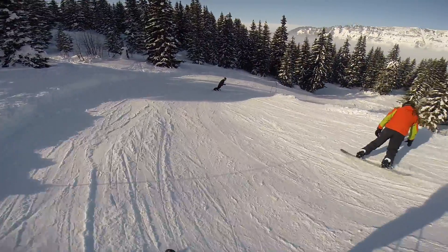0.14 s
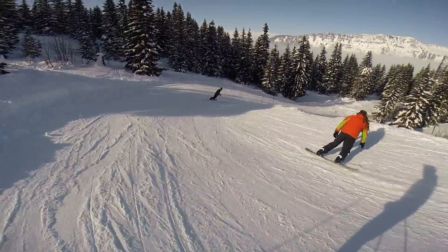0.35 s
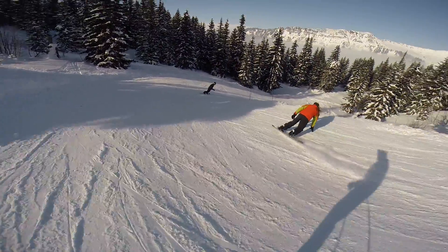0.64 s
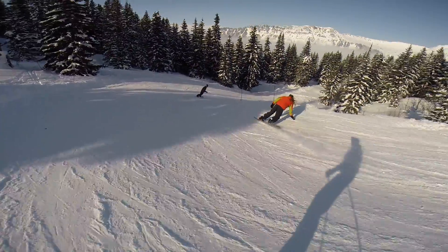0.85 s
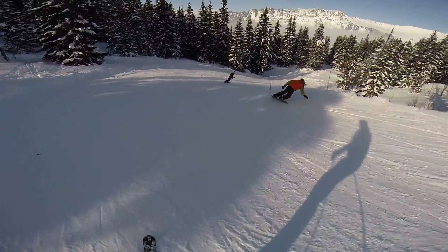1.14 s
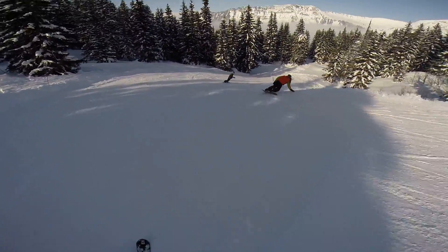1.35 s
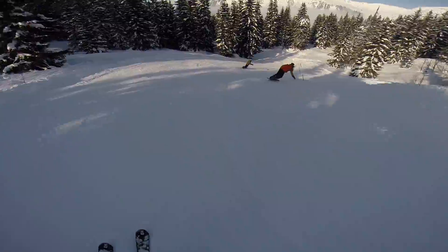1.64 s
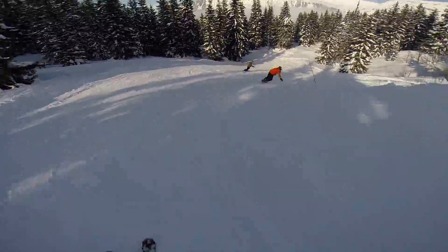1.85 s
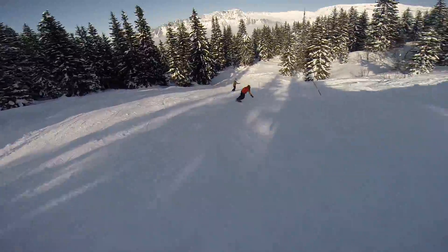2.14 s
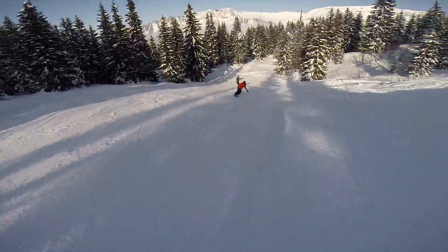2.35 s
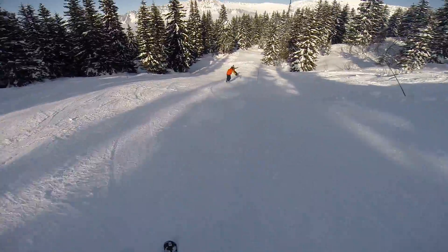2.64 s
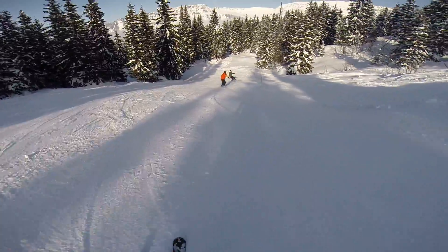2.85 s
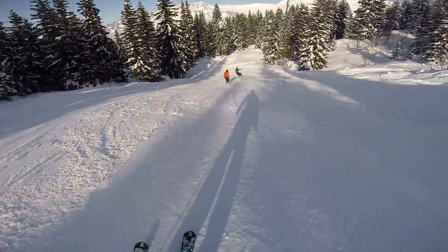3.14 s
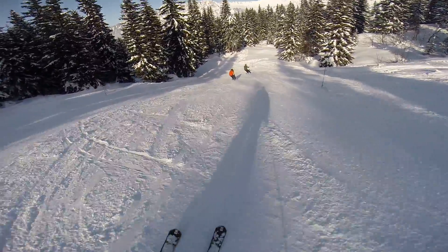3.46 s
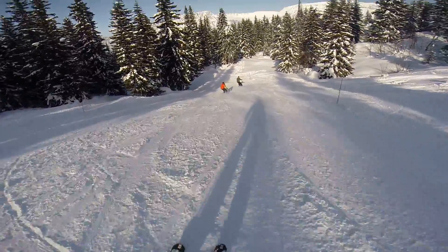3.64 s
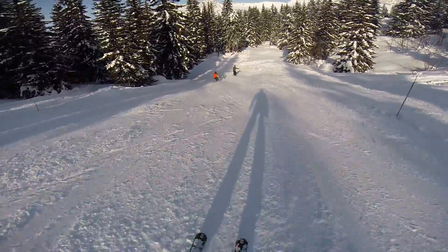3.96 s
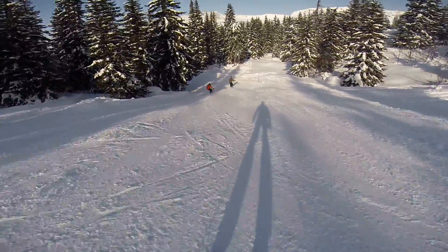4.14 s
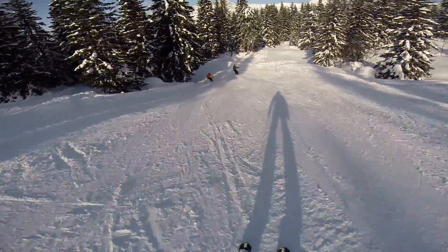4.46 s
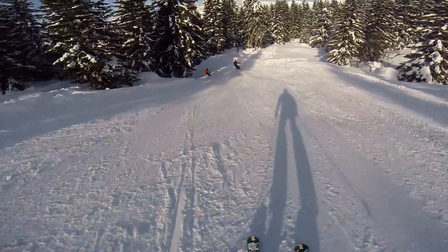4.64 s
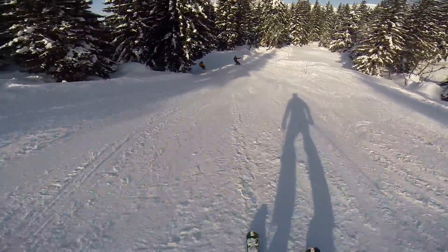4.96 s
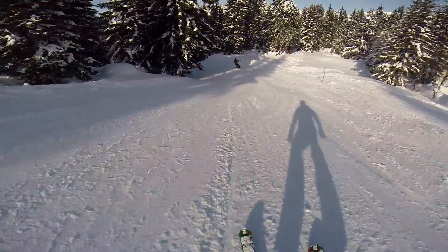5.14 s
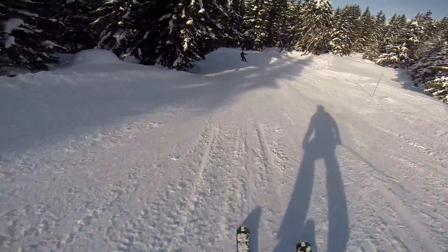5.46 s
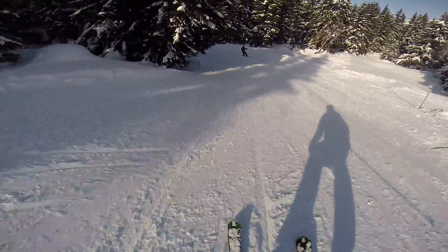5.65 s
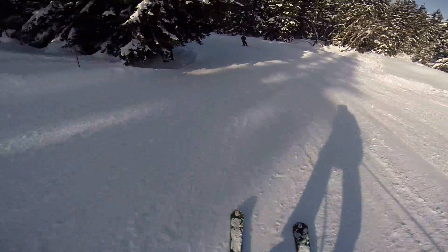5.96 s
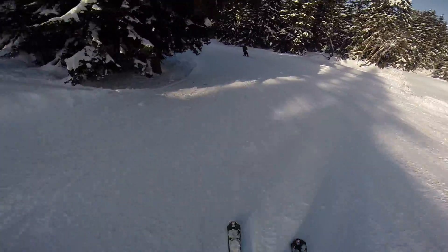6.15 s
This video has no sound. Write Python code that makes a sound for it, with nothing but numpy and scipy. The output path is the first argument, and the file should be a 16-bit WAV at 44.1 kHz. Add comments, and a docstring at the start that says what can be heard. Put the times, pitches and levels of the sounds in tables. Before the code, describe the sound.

First-person ski run: steady grainy snow hiss, low bumps and buffeting, small ticks and icy crackles, headwind growing stronger toward the end.

```python
"""Skis glide down a groomed slope, heard by a camera in a closed case on the skier's helmet.
From the start filtered noise and random grains hiss and spray off the edges, turbulence noise rumbles
on the case, bumps shake its mount, and low buffeting noise swells and sinks. Damped gear ticks join
after a second, snow spurts and ice grains crackle here and there. From 3.6 s an unsteady sine whistles
over the case's port, the headwind and hiss grow strong, and grains crack thickest near the end, at 6.3 s."""
import sys
import numpy as np
from scipy import signal
from scipy.fft import rfft, irfft, next_fast_len
from scipy.io import wavfile
from scipy.ndimage import uniform_filter1d, map_coordinates

SR = 44100
rng = np.random.default_rng(int(sys.argv[2]) if len(sys.argv) > 2 else 0)


def master_out(mix):
    """Clip the mix to full scale and print it as 16-bit PCM to the path in sys.argv[1]."""
    frames = np.transpose(np.atleast_2d(mix))
    ceiling = np.clip(frames, -1, 1)
    pcm = np.round(ceiling * 32767).astype(np.int16)
    wavfile.write(sys.argv[1], SR, pcm)


N = 277830  # samples, 6.3 s


def amp(db):
    """Gain of a level in dB."""
    return 10 ** (np.asarray(db) / 20)


def unit(x):
    """x at rms 1."""
    return x / np.sqrt(np.mean(x ** 2) + 1e-20)


def noise():
    """White noise for the whole scene."""
    return rng.standard_normal(N)


def curves(rows):
    """One value per sample for each column after the time, joined by straight lines."""
    s, *columns = np.transpose(rows)
    return [np.interp(np.arange(N) / SR, s, column) for column in columns]


def wobble(rate):
    """A smooth random curve, rate knots a second."""
    knots = rng.standard_normal(int(N * rate / SR) + 4)
    return map_coordinates(knots, [np.arange(N) * rate / SR])


def swells(times, sizes, rise_s, tail):
    """Sum of swells: a bell-shaped rise to each peak, then a tail given as a function of the time since."""
    since = np.arange(N) / SR - np.array(times)[:, None]
    shapes = np.where(since < 0, np.exp(-(since / rise_s) ** 2), tail(np.abs(since)))
    return np.array(sizes) @ shapes


def filtered(x, response):
    """x times a response of frequency."""
    m = next_fast_len(N + SR // 2)  # padded, so that the end does not wrap onto the start
    return irfft(rfft(x, m) * response(np.fft.rfftfreq(m, 1 / SR)), m)[..., :N]


def coloured(x, points):
    """x through a (Hz, dB) spectrum, at rms 1."""
    f, db = np.transpose(points)
    return unit(filtered(x, lambda hz: amp(np.interp(np.log(hz + 1), np.log(f), db, -120, -120))))


def patchy(patchy_db):
    """White noise with patches of random gain in time and frequency."""
    spectrum = signal.stft(noise(), nperseg=512)[2]
    field = uniform_filter1d(rng.standard_normal(spectrum.shape), 6, 0)  # smooth over frequency
    field = uniform_filter1d(field, 10, 1)  # and over time
    return signal.istft(spectrum * amp(patchy_db * unit(field)), nperseg=512)[1][:N]


# Headwind. Each row: time in seconds, strength in dB, low rumble in dB; both waver around these.
HEADWIND = [(0, -52.5, -48), (.2, -53, -51.5), (.45, -51, -51.5), (.9, -49, -55.5), (1.15, -50, -48),
            (1.6, -48.5, -47.5), (1.9, -49.5, -52.5), (2.35, -46.5, -46.5), (2.7, -46, -49),
            (3.25, -48, -50.5), (3.8, -49.5, -53.5), (4.3, -45.5, -51), (4.5, -46.5, -46),
            (4.75, -44, -45.5), (5.3, -42.5, -42.5), (5.55, -42.5, -43.5), (5.93, -43.5, -43.5),
            (6.18, -42.5, -39), (6.3, -42, -42)]
# Spectra of the low rumble, the roar and the breath in the port.
# Each row: frequency in Hz, relative level in dB per Hz.
RUMBLE_SPECTRUM = [(45, -33), (72, -3), (130, -5), (160, -10.5), (200, -27)]
ROAR_SPECTRUM = [(110, -35), (145, -2), (175, -2.5), (300, -8), (420, -16), (600, -66)]
PORT_SPECTRUM = [(330, -69), (450, -1), (650, -3.5), (745, 0.5), (850, -4.5), (1050, -11.5), (1300, -16)]
PORT_DB, PORT_FOLLOWS = -54, 0.81  # level at mean wind; the port swings less than the wind


def wind():
    """Turbulence, as shaped noise, rumbles and roars on the case and breathes in its port."""
    wind_db, rumble_db = curves(HEADWIND)
    rumble = amp(rumble_db + 2.7 * wobble(6)) * coloured(noise(), RUMBLE_SPECTRUM)
    roar = amp(wind_db + 0.55 * wobble(20)) * coloured(patchy(patchy_db=0.8), ROAR_SPECTRUM)
    port_db = PORT_DB + PORT_FOLLOWS * (wind_db - wind_db.mean()) + 0.71 * wobble(3.99)
    port = amp(port_db) * coloured(patchy(patchy_db=0.94), PORT_SPECTRUM)
    return rumble + roar + port


# Bumps that kick the mount. Each row: time in seconds, kick in dB before smoothing.
BUMP_KICKS = [(0.02, -41), (0.278, -37.5), (0.54, -38.5), (0.84, -42), (0.97, -41.5), (1.11, -38),
              (1.16, -37.5), (1.27, -31), (1.38, -56), (1.46, -41), (1.57, -28.5), (1.64, -36), (1.72, -31),
              (1.79, -39), (2.23, -37.5), (2.38, -41.5), (2.63, -45), (2.85, -35.5), (3.13, -41.5),
              (3.22, -40), (3.41, -33), (3.5, -42.5), (3.6, -31.5), (3.84, -40.5), (4.0, -46),
              (4.47, -37.5), (4.83, -43.5), (4.98, -36.5), (5.22, -37), (5.36, -38), (5.46, -44),
              (5.57, -33.5), (5.79, -33.5), (5.98, -35.5), (6.12, -37.5), (6.27, -44)]
# Swells of the low buffeting noise. Each row: time of the peak in seconds, level in dB.
BUFFET_SWELLS = [(0.27, -42), (1.09, -37), (1.23, -28), (1.4, -38), (1.52, -35), (2.41, -46.5), (3.29, -35),
                 (3.51, -32.5), (3.62, -32), (4.52, -31.5), (4.71, -31.5), (5.25, -43.5), (5.49, -41),
                 (5.87, -33), (5.96, -39), (6.15, -42)]
# Spectra of the mount's shake and the low buffeting.
# Each row: frequency in Hz, relative level in dB per Hz.
MOUNT_SPECTRUM = [(36, -23), (44, -0.5), (51, -4), (58, -2), (66, -16.5)]
BUFFET_SPECTRUM = [(10, -31), (18, -8), (30, -1.5), (40, -1), (50, -20)]
KICK_S, RING_DB_PER_S = 0.037, 131  # rise of a kick and its fading, before smoothing
SWELL_S = 0.04  # time from a swell's peak down to 1/e
JOSTLE_DB, BUFFET_DB = -2, 0.5  # steady shake and steady buffeting against the headwind


def ride():
    """Bumps ring the springy mount near 50 Hz, and low buffeting noise swells and sinks."""
    wind_db, _ = curves(HEADWIND)
    s, db = np.transpose(BUMP_KICKS)
    kicks = swells(s, amp(db), KICK_S, lambda u: amp(-RING_DB_PER_S * u))
    shaking = np.hypot(amp(wind_db + JOSTLE_DB + 3.2 * wobble(13)), kicks)
    shaking = uniform_filter1d(shaking, size=SR // 40)  # smoothed over 25 ms

    s, db = np.transpose(BUFFET_SWELLS)
    lumps = swells(s, amp(db), SWELL_S, lambda u: np.exp(-(u / SWELL_S) ** 2))
    buffeting = np.hypot(amp(wind_db + BUFFET_DB), lumps)

    swing = unit(np.sin(2 * np.pi * np.cumsum(50 + 3.52 * wobble(12)) / SR))  # pitch wanders
    shake = unit(swing + 0.5 * coloured(noise(), MOUNT_SPECTRUM))
    return shaking * shake + buffeting * coloured(noise(), BUFFET_SPECTRUM)


# Pitch of the whistle. Each row: time in seconds, frequency in Hz around which it wanders.
WHISTLE_PITCH = [(3.6, 543), (3.85, 542), (4.4, 650), (4.66, 709), (4.8, 695), (4.86, 735), (4.94, 721),
                 (5.06, 770), (5.13, 752), (5.22, 735), (5.29, 770), (5.39, 715), (5.6, 755), (5.67, 730),
                 (5.76, 762), (5.84, 745), (6.3, 756)]
# Spells in which it sings. Each row: start in seconds, length in seconds, level at the start in dB,
# level at the end in dB; the level flutters around these.
WHISTLE_SPELLS = [(3.6, 1, -61, -63), (4.602, 0.18, -59, -54), (4.84, .17, -54.5, -55),
                  (5.036, 0.16, -52, -48), (5.264, 0.116, -53, -50), (5.581, 0.096, -51, -53),
                  (5.703, 0.146, -49, -50), (6.14, .2, -58, -54)]
SPELL_FADE_S = .02  # fade before and after each spell


def whistle():
    """Air over the port sings in spells: a wandering sine with noise on its phase and amplitude for breath."""
    hz, = curves(WHISTLE_PITCH)
    t = np.arange(N) / SR
    level = np.zeros(N)
    for start, length, db, end_db in WHISTLE_SPELLS:
        end = start + length
        fade = np.clip(np.minimum(t - start, end - t) / SPELL_FADE_S + 1, 0, 1)
        level += amp(np.interp(t, [start, end], [db, end_db])) * fade
    turn = 2 * np.pi * np.cumsum(hz + 8 * wobble(35)) / SR
    breathy = 0.33 * (wobble(70) * np.cos(turn) + wobble(70) * np.sin(turn))
    return level * amp(1.3 * wobble(14)) * unit(np.sin(turn) + breathy)


# Gear ticks. Each row: time in seconds, strength in dB before a common trim.
GEAR_TICKS = [(1.0969, -38), (1.9659, -36), (3.7174, -34), (4.611, -32.5), (4.8274, -34), (4.9232, -37),
              (5.1685, -33), (5.2579, -39), (5.682, -31), (5.7184, -30.5), (5.8357, -29), (6.1416, -24.5)]
# Ringing modes of the small metal part.
# Each row: frequency in Hz, relative level in dB before scatter, time to fall 60 dB in seconds.
BUCKLE_MODES = [(3760, -8, 0.014), (4300, -6.5, 0.0085), (5250, -8, 0.0086)]


def ticks():
    """Each tick rings the decaying modes of the small metal part at new strengths."""
    out, t = np.zeros(N + SR), np.arange(SR // 20) / SR
    attack = 1 - np.exp(-t / 0.00079)
    scatters_db = rng.normal(0, 1.5, (len(GEAR_TICKS), len(BUCKLE_MODES)))
    for (s, db), scatter_db in zip(GEAR_TICKS, scatters_db):
        ring = np.zeros(len(t))
        for (hz, level_db, t60), offset_db in zip(BUCKLE_MODES, scatter_db):
            ring += amp(level_db + offset_db - 60 * t / t60) * np.sin(2 * np.pi * hz * t)
        out[round(s * SR):][:len(t)] += amp(db + 2.0) * ring * attack
    return out[:N]


# Ice grains that crack close by. Each row: time in seconds, strength of the bright part in dB,
# strength of the dull part in dB, both before a trim and a filter.
ICE_CRACKS = [(0.1725, -54, -42), (1.5609, -48, -37), (1.5744, -50, -37), (3.6306, -51, -46),
              (3.6396, -47, -46), (3.9679, -50, -45), (5.009, -52, -40), (5.031, -50, -36),
              (5.0494, -51, -34), (5.0974, -52, -43), (5.455, -45, -36), (5.497, -48, -31),
              (5.512, -48, -37), (5.5385, -50, -29), (5.5514, -46, -40), (5.5598, -45, -42),
              (5.962, -48, -30), (5.98, -41, -43), (5.997, -41, -37), (6.0345, -34, -26),
              (6.0422, -46, -38)]


def cracks():
    """A one-sample snap with milliseconds of crumbling noise, bright and dull parts filtered apart."""
    bright, dull, t = np.zeros(N + SR), np.zeros(N + SR), np.arange(SR // 20) / SR
    puffs = rng.standard_normal((len(ICE_CRACKS), len(t)))
    for (s, bright_db, dull_db), puff in zip(ICE_CRACKS, puffs):
        crumble = puff + 3.2 * (t == 0)
        start = round(s * SR)
        bright[start:][:len(t)] += amp(bright_db - 7 - 60 * t / .006) * crumble  # 60 dB down in 6 ms
        dull[start:][:len(t)] += amp(dull_db - 5.5 - 60 * t / 0.021) * crumble  # in 21 ms

    def high(f):
        """High-pass at 5 kHz, softened above 14 kHz."""
        return (1j * f / 5000 / (1 + 1j * f / 5000)) ** 2 / (1 + 1j * f / 14000)

    def resonance(f, centre, width):
        """Band-pass around the centre, both in Hz."""
        return 1j * f * width / (centre ** 2 - f * f + 1j * f * width)

    def middle(f):
        """Two broad resonances."""
        return resonance(f, 2400, 1500) + .4 * resonance(f, 5000, 2500)

    return filtered(bright[:N], high) + filtered(dull[:N], middle)


def grains(rate, spread_db):
    """Crushed snow crystals: random clicks of scattered size, rate a second."""
    hit = rng.random(N) < rate / SR
    return unit(hit * rng.standard_normal(N) * amp(spread_db * rng.standard_normal(N)))


# Skis on the snow. Each row: time in seconds, glide hiss in dB, fine fizz in dB,
# before ripples and spurts.
SNOW_LEVELS = [(0.0, -47.5, -73), (0.1, -55.5, -75), (0.32, -49.5, -74), (0.55, -50.5, -72.5),
               (0.76, -47.5, -72.5), (0.86, -45.5, -73), (1.25, -44.5, -67), (1.5, -44.5, -65.5),
               (1.7, -46.5, -62.5), (1.91, -51.5, -65.5), (2.05, -45, -66.5), (2.25, -41.5, -63.5),
               (2.42, -41, -70), (2.65, -42, -68), (2.8, -44.5, -69), (3.19, -43.5, -66.5),
               (3.28, -43, -67), (3.34, -40.5, -62), (3.44, -43, -61), (3.56, -44, -69),
               (3.66, -48.5, -65.5), (3.8, -43.5, -71.5), (3.95, -46.5, -71.5), (4.25, -43, -71.5),
               (4.56, -42, -71.5), (4.66, -38.5, -70), (4.97, -38, -66), (5.08, -37.5, -65.5),
               (5.33, -37.5, -63), (5.42, -41.5, -67), (5.53, -42, -67.5), (5.6, -39, -68),
               (5.84, -37.5, -65.5), (5.98, -44, -67), (6.12, -40, -65), (6.3, -38.5, -63)]
# Edges in the snow. Each row: time in seconds, scrape in dB, spray in dB, before ripples and spurts.
EDGE_LEVELS = [(0, -60.5, -63.5), (.45, -55.5, -61), (.7, -59.5, -62.5), (.85, -50.5, -59.5),
               (1.45, -52.5, -56), (1.65, -50, -52.5), (1.88, -53, -57.5), (2.3, -50.5, -53),
               (2.6, -48, -57), (3.15, -51.5, -57.5), (3.35, -51, -53), (3.6, -53, -60), (4.0, -55.5, -59),
               (4.55, -52.5, -56.5), (4.7, -52.5, -55), (5.27, -49, -49.5), (5.43, -49.5, -54),
               (5.81, -44, -53.5), (5.98, -48, -53), (6.3, -50.5, -51)]
# Short spurts of snow off the edges. Each row: time in seconds, rise of the spray, sheen and fizz in dB,
# rise of the glide in dB; overlapping spurts add up.
SNOW_SPURTS = [(1.562, 7, 1), (1.655, 2, 0.5), (1.95, 2.5, 3), (3.63, 6, 0), (3.78, 1.5, 3), (4.08, 0, 1.5),
               (4.61, 2, 3.5), (4.915, 3, 2.5), (5.05, 0, 3.5), (5.257, 3.5, 3.5), (5.495, 2, 7),
               (5.54, 5, 7.5), (5.553, 5, 0.5), (6.033, 1.5, 1.5)]
# Spectra of the five snow layers; the case's main resonance colours the glide.
# Each row: frequency in Hz, relative level in dB per Hz.
SCRAPE_SPECTRUM = [(900, -12.5), (1150, -11), (1400, -6), (1600, -0.5), (1900, -6.5), (2300, -11.5)]
GLIDE_SPECTRUM = [(1000, -31), (1700, -2), (1870, -3), (2220, 1), (2450, -1), (2930, -5.5), (3390, -18.5),
                  (3800, -20.5), (4940, -32), (8360, -120)]
SPRAY_SPECTRUM = [(2600, -11), (3400, -2), (4300, 1), (4700, -2.5), (5200, 2), (5900, 4), (6400, 1.5),
                  (6800, -8), (7600, -34)]
SHEEN_SPECTRUM = [(6000, -30), (6800, -0.5), (7600, 0.5), (8500, -2.5), (8900, -10), (10000, -40)]
FIZZ_SPECTRUM = [(5240, -34), (8600, -8), (9100, -3.5), (10100, -1), (11600, -4.5), (12200, -6),
                 (14700, -12.5), (15300, -11)]
SPURT_RISE_S, SPURT_S = 0.0035, 0.024  # rise, fall
SHEEN_DB, SHEEN_RISES_S, SHEEN_RISE_DB = -1, (3.4, 4.6), 5.5  # against the fizz; start and end of its rise


def snow():
    """Patchy noise and crystal clicks in five bands share the ripples of the track."""
    glide_db, fizz_db = curves(SNOW_LEVELS)
    scrape_db, spray_db = curves(EDGE_LEVELS)
    sheen_db = fizz_db + SHEEN_DB + np.interp(np.arange(N) / SR, SHEEN_RISES_S, [0, SHEEN_RISE_DB])

    def spurts(rises_db):
        """Sum of the quick level rises."""
        return swells(s, rises_db, SPURT_RISE_S, lambda u: np.exp(-(u / SPURT_S) ** 2))

    s, high_up_db, glide_up_db = np.transpose(SNOW_SPURTS)
    ripples = 0.18 * wobble(35) + 0.94 * wobble(70)
    glide_db = glide_db + spurts(glide_up_db) + 0.63 * ripples + 0.35 * wobble(28)
    high_db = spurts(high_up_db) + 0.62 * ripples + 0.27 * wobble(8)

    crystals = grains(rate=1500, spread_db=2.5)
    powder = grains(rate=610, spread_db=3.5)
    spray_powder = grains(rate=610, spread_db=3.5)  # the spray has powder of its own
    scrape = coloured(patchy(patchy_db=1.0) + .4 * crystals, SCRAPE_SPECTRUM)
    glide = coloured(patchy(patchy_db=1.0) + 0.48 * crystals, GLIDE_SPECTRUM)
    spray = coloured(patchy(patchy_db=1.6) + 0.26 * crystals + 0.48 * spray_powder, SPRAY_SPECTRUM)
    sheen = coloured(patchy(patchy_db=1.0) + 0.24 * crystals + 0.39 * powder, SHEEN_SPECTRUM)
    fizz = coloured(patchy(patchy_db=1.5) + .2 * crystals + 0.33 * powder, FIZZ_SPECTRUM)

    low = amp(scrape_db + 0.31 * ripples) * scrape + amp(glide_db) * glide
    high = amp(spray_db) * spray + amp(sheen_db) * sheen + amp(fizz_db) * fizz
    return low + amp(high_db) * high


def scene():
    """Everything adds up at one microphone, with no echoes in the open air."""
    return (wind() + ride() + whistle() + ticks() + cracks() + snow())[None]


TOP_HZ = 15260  # the camera's band limit


def record(dry):
    """The camera keeps nothing above its band limit."""
    return filtered(dry, lambda hz: hz < TOP_HZ)


dry = scene()
out = record(dry)
master_out(out)
```